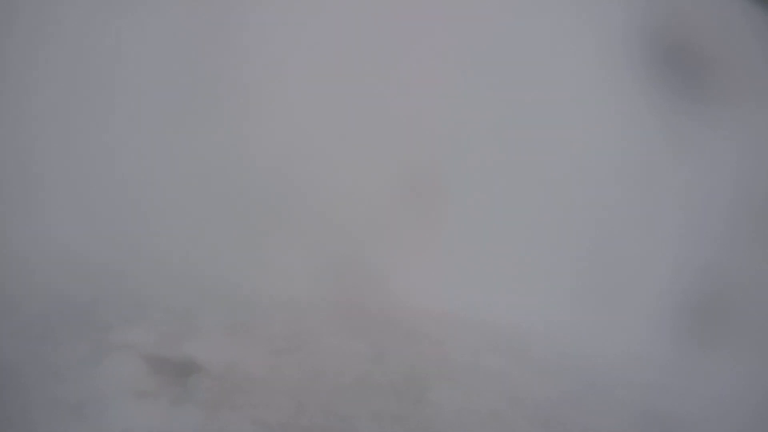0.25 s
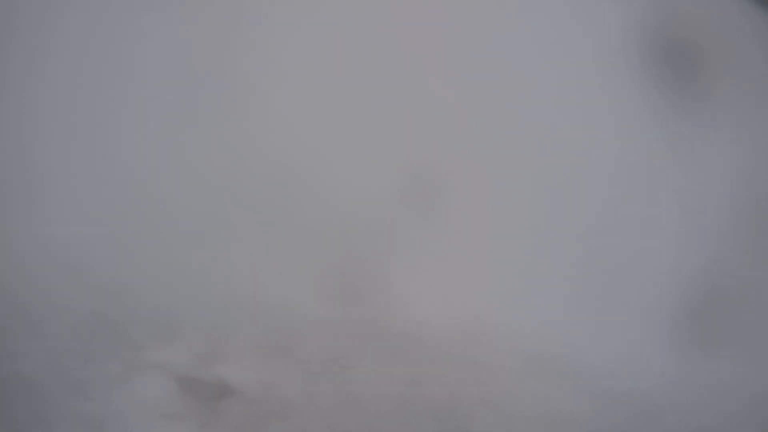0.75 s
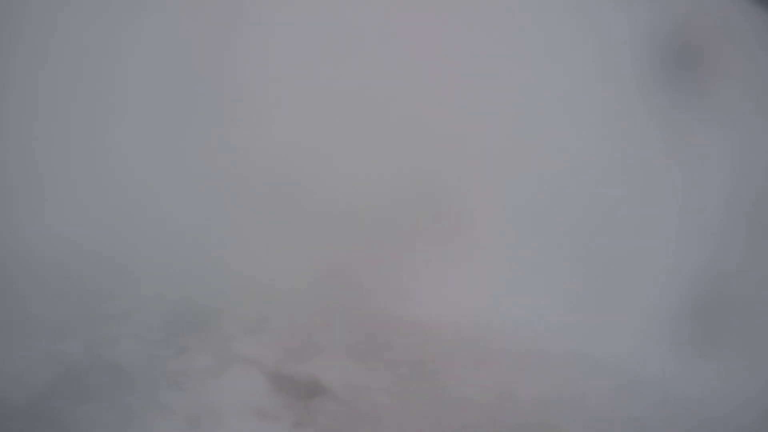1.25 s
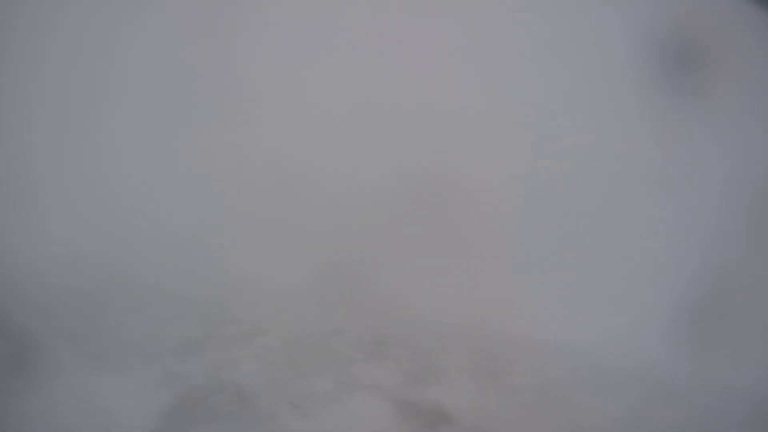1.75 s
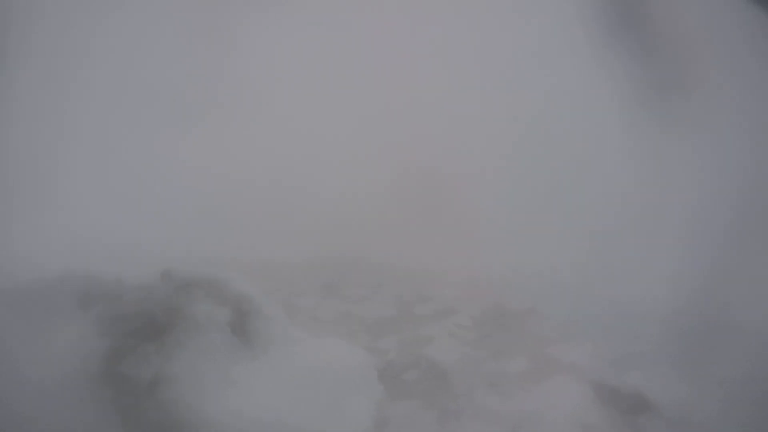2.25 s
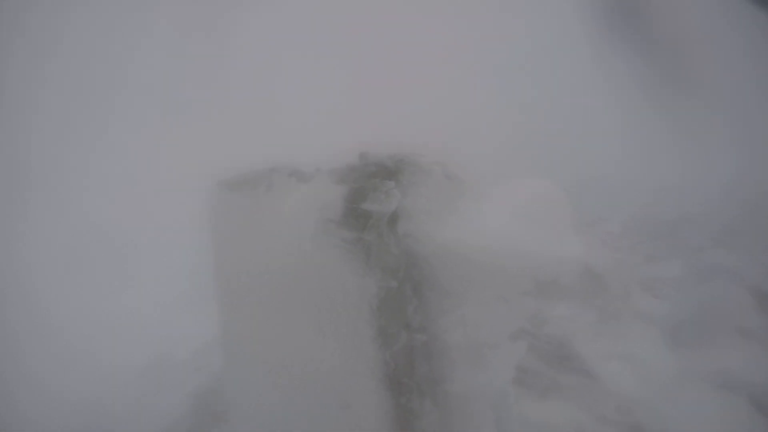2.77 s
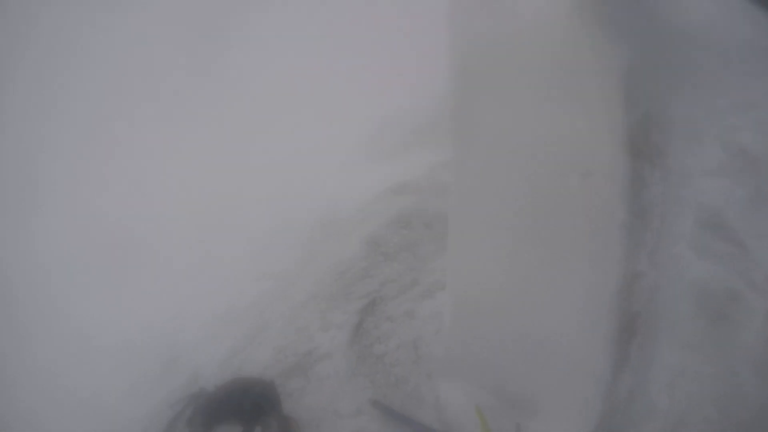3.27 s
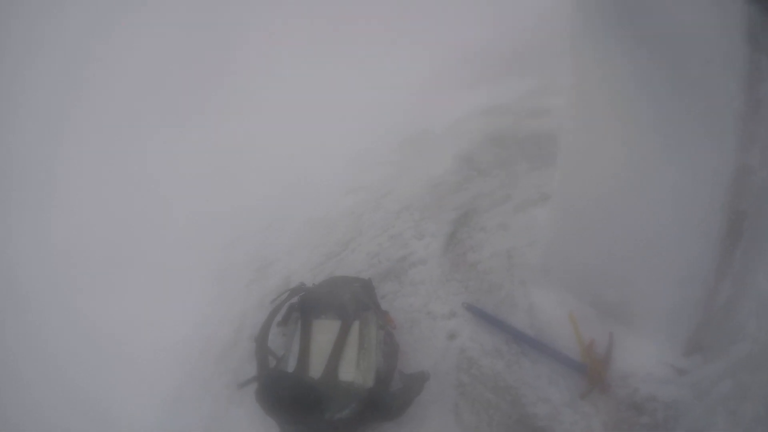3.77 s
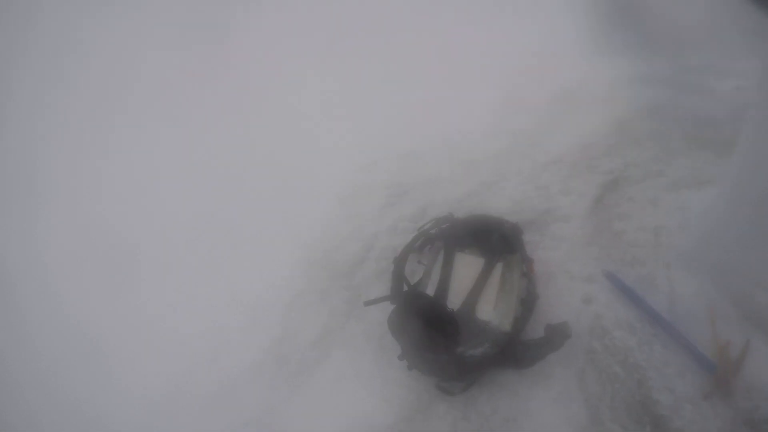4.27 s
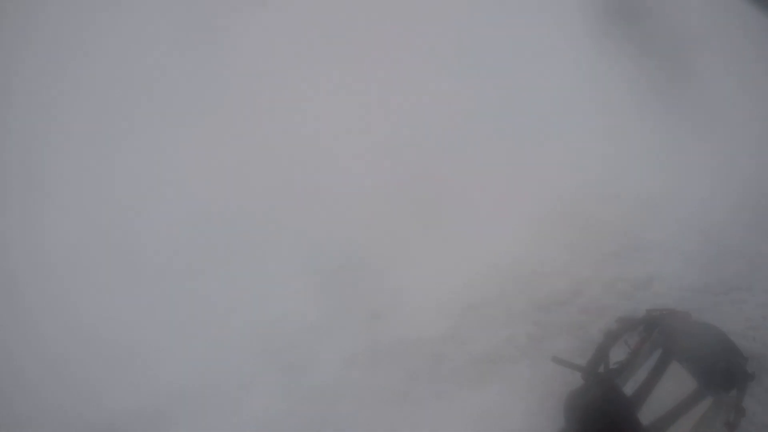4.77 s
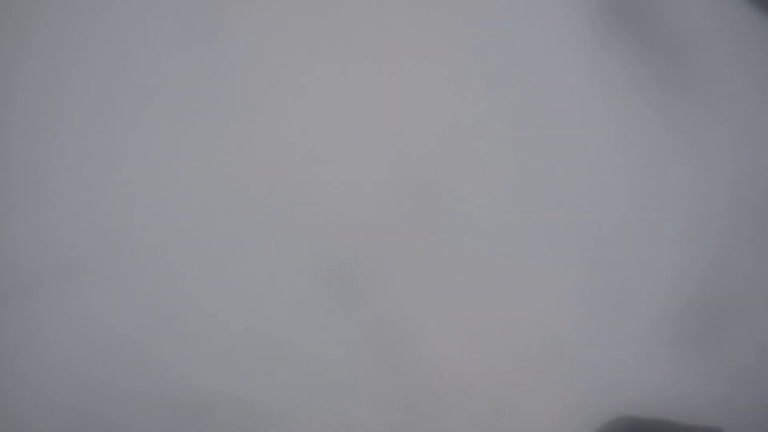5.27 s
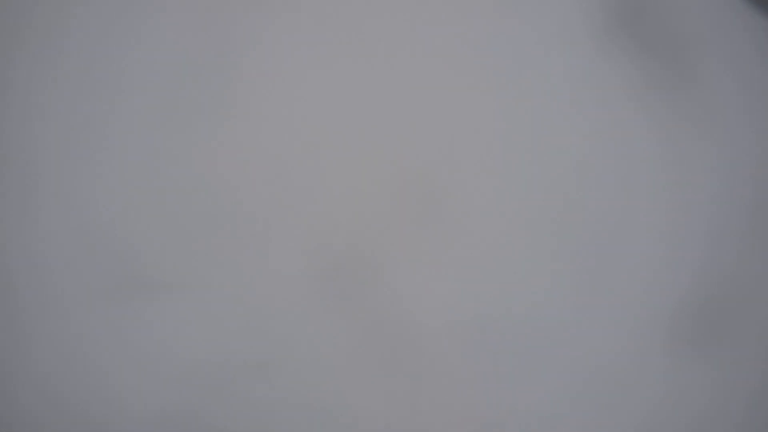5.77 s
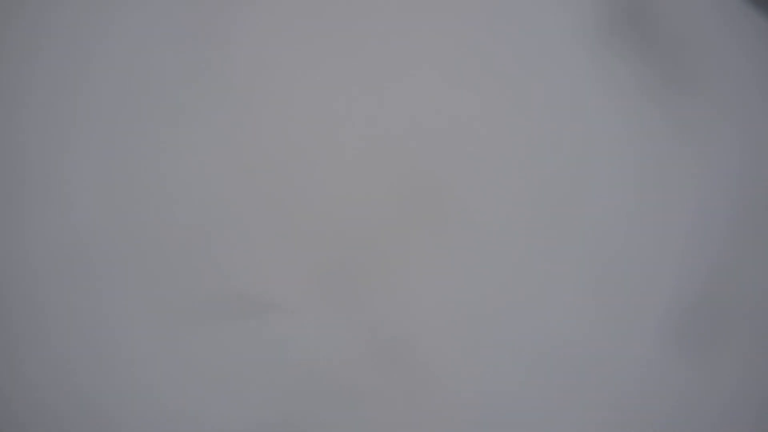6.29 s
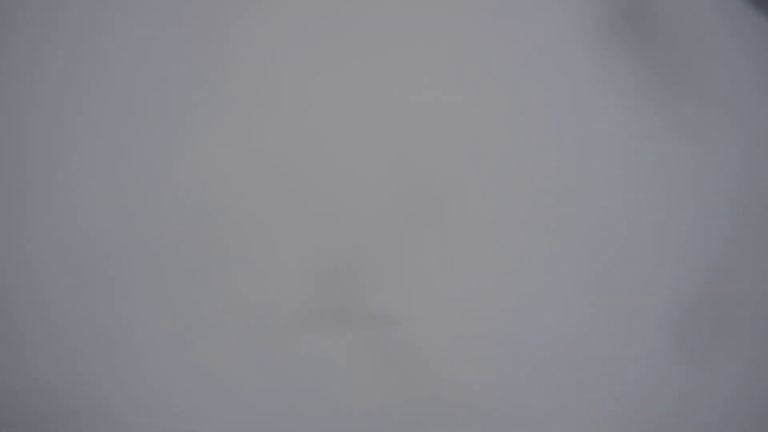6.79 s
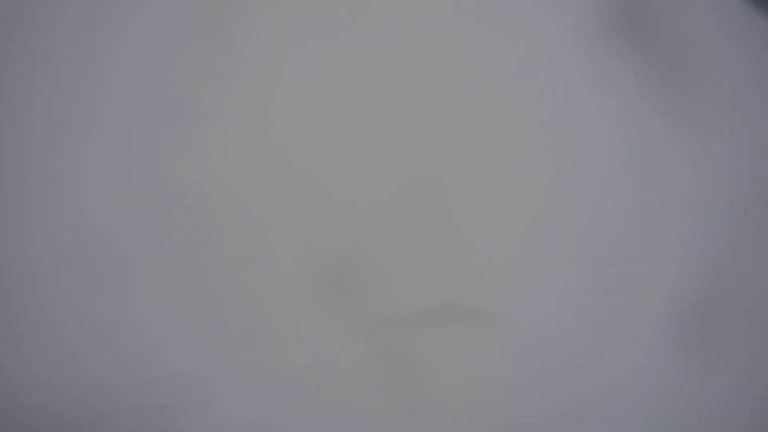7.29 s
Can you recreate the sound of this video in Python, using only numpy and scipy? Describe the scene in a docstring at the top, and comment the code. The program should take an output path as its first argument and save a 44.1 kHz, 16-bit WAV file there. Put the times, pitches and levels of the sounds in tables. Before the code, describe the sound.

On an exposed snowy summit, wind roars in a small camera's plastic case while ice pellets strike it in dense, irregular sharp cracks, the loudest overloading. After about three seconds the impacts become sparse and wind dominates. A low swell near five seconds drops to a lull, followed by ragged short gusts and a few last clicks. The microphone is directly in the weather, mono and close.

```python
"""Blizzard on a bare summit

A small camera: gusts buffet its microphone port and roar in its plastic case (shaped, patchy noise).
Ice pellets crack on the case (decaying modes plus a noise burst), thickly while it faces the wind,
sparsely once it turns away; small grains tick over a hiss of powder (noise).
The loudest cracks reach the top of the recorder's range and are limited there.
"""
import sys
import numpy as np
from scipy import signal
from scipy.fft import rfft, irfft, next_fast_len
from scipy.io import wavfile
from scipy.ndimage import uniform_filter1d, map_coordinates

SR = 44100
rng = np.random.default_rng(int(sys.argv[2]) if len(sys.argv) > 2 else 0)


def materialize(psi):
    """Save the field psi as 16-bit PCM at rate SR to the path in sys.argv[1].

    A 1-D psi becomes a single channel; in a 2-D psi each row is a channel.
    """
    bounded = np.clip(np.atleast_2d(psi).T, -1, 1)
    quanta = np.round(bounded * 32767).astype(np.int16)
    wavfile.write(sys.argv[1], SR, quanta)


N = 332514
STEADY_TOP_HZ, TOP_HZ = 15400, 16480  # band limits: wind and sleet; recorder


def amp(db):
    """Amplitude factor of a level in dB."""
    return 10 ** (np.asarray(db) / 20)


def unit(x):
    """x scaled to rms 1."""
    return x / np.sqrt(np.mean(x ** 2) + 1e-20)


def wobble(rate_hz):
    """Smooth random curve: a spline through rate_hz normal knots a second."""
    knots = rng.standard_normal(int(N * rate_hz / SR) + 4)
    return map_coordinates(knots, [np.arange(N) * rate_hz / SR])


def curves(rows):
    """Per-sample interpolation of each column after the time."""
    knot_s, *columns = np.transpose(rows)
    return [np.interp(np.arange(N) / SR, knot_s, column) for column in columns]


def filtered(x, response):
    """x with its spectrum multiplied by response(f/Hz), zero phase."""
    length = x.shape[-1]
    m = next_fast_len(length + 8192)
    spectrum = rfft(x, m) * response(np.fft.rfftfreq(m, 1 / SR))
    return irfft(spectrum, m)[..., :length]


def below(top_hz):
    """Low-pass response falling to zero over the last 150 Hz under top_hz."""
    return lambda f: np.clip((top_hz - f) / 150, 0, 1) ** 2


def rush(spectrum, patchy_db):
    """Turbulence: noise of rms 1, shaped by spectrum, with time-frequency patches of random gain."""
    z = signal.stft(rng.standard_normal(N), nperseg=512)[2]
    patches = uniform_filter1d(rng.standard_normal(z.shape), size=8, axis=0)
    patches = uniform_filter1d(patches, size=6, axis=1)
    noise = signal.istft(z * amp(patchy_db * unit(patches)), nperseg=512)[1][:N]
    hz, db = np.transpose(spectrum)

    def colour(f):
        return amp(np.interp(np.log(f + 1), np.log(hz + 1), db, left=-120, right=-120))

    return unit(filtered(noise, colour))


def wind():
    """Eddies thump the port; each swing of the thump drives air through the case, so the roar throbs with it."""
    # noise densities: f/Hz, relative density/dB
    thump_spectrum = [(15, -7.5), (30, -2), (55, -1), (85, -4.5), (140, -20.5)]
    flutter_spectrum = [(60, -60), (110, -0.5), (330, -12.5), (700, -25), (1200, -63)]
    roar_spectrum = [(450, -11), (650, -3), (1450, 0), (1760, 6.5), (2100, 0.5), (2550, 3), (3300, 0.5),
                     (3900, -14.5)]
    hiss_spectrum = [(3200, -7.5), (3900, -5), (4550, -0.5), (5600, -7), (6500, -8), (7600, -18.5),
                     (13000, -28.5)]
    song_spectrum = [(1900, -16), (2600, -5), (3500, -13.5)]
    # wind between the gusts: t/s, thump/dB, steady flutter/dB, roar/dB, hiss/dB (before wander)
    lulls = [(0.0, -34, -42, -37.5, -44.5), (0.9, -38.5, -41, -38, -45.5), (1.55, -40.5, -47, -41.5, -48),
             (2.3, -38.5, -38.5, -39, -48.5), (3.08, -34.5, -41, -43.5, -54), (3.24, -35, -36.5, -34, -42),
             (3.6, -32, -34.5, -38.5, -44), (4.1, -32.5, -36.5, -40, -50),
             (4.6, -32.5, -39.5, -42.5, -55.5), (5.0, -25, -41, -47, -61.5), (5.4, -35, -82, -54.5, -63.5),
             (6.1, -40.5, -66, -53, -64), (6.72, -40, -59.5, -59.5, -68.5),
             (7.1, -31.5, -50.5, -50.5, -67.5), (7.54, -26.5, -39, -52, -54)]
    turned_s = 5.1  # from then on the wind also sings across the port
    flutter_share = 0.47  # dB of flutter per dB of gust rise in the case
    shake_under_thump_db = 18  # flutter that the thump shakes loose
    hiss_wander_db = 3

    t = np.arange(N) / SR
    thump_db, steady_db, roar_db, hiss_db = curves(lulls)
    port_db, case_db = gusts()
    thump_db = thump_db + port_db
    roar_db = roar_db + case_db
    shaken_db = thump_db - shake_under_thump_db + flutter_share * case_db
    flutter_gain = np.hypot(amp(steady_db), amp(shaken_db))
    hiss_share = 1 - 0.17 * (t > turned_s)  # dB of hiss per dB of gust rise in the case
    hiss_db = hiss_db + hiss_share * case_db + hiss_wander_db * wobble(6.9)

    eddies = wobble(15)
    thump = unit(amp(2 * eddies) * rush(thump_spectrum, patchy_db=0.5))
    flutter = unit(amp(eddies + wobble(50)) * rush(flutter_spectrum, patchy_db=1))

    turned = np.clip(t - turned_s, 0, 0.5) * 2  # 0 to 1 over 0.5 s
    # across the port the flow tears into short rags
    throb = amp(1.1 * (thump + wobble(45)) + 2.6 * turned * wobble(110))
    roar = unit(throb * rush(roar_spectrum, patchy_db=1.35))
    hiss = unit(throb * rush(hiss_spectrum, patchy_db=2.0))
    song = unit(throb * rush(song_spectrum, patchy_db=3))
    roar = roar + amp(-11.0) * turned * song

    at_port = buffets() + amp(thump_db) * thump + flutter_gain * flutter
    return at_port + amp(roar_db) * roar + amp(hiss_db) * hiss


def sleet(count):
    """Small grains strike at random, levels skewed to a loud few, over a fine hiss of powder."""
    # sleet strength: t/s, level/dB
    strength = [(0.0, -50), (2.23, -51.5), (3.0, -54), (3.32, -70.5), (4.23, -68), (5.11, -71.5),
                (5.79, -67.5), (5.95, -72.5), (6.35, -65.5), (6.6, -70.5), (7.24, -70), (7.54, -61)]
    dullest_hz = 2200
    sleet_db, = curves(strength)
    # facing the wind makes the grains louder and widens their level spread, while the powder grows only a
    # little
    facing = (sleet_db + 70.5) / 20
    flurries_db = 3 * wobble(12)

    hit_s = rng.uniform(0, N / SR, count)
    at = (hit_s * SR).astype(int)
    size = np.minimum(rng.exponential(size=count), 2.8)
    place, hardness = rng.standard_normal((2, count))
    peak_db = (sleet_db + flurries_db)[at] + 23.5 + (2.12 + 2.33 * facing[at]) * size
    centre_hz = np.maximum(3300 * amp(4.57 * place), dullest_hz)
    grains = strike(hit_s, peak_db, centre_hz, -8 + 7 * hardness, scatter_db=7.0)

    powder = rush([(4000, -25), (7000, 0), (STEADY_TOP_HZ, -4)], patchy_db=5.5)
    return grains + amp(-70.5 + 8.0 * facing + flurries_db) * powder


def strike(hit_s, peak_db, centre_hz, treble_db, scatter_db):
    """Each pellet rings the case modes near its centre, at random strengths, and shatters (treble burst)."""
    # case modes: f/Hz, level/dB, t60/s
    case = [(676, -12.5, 0.057), (1274, -1.5, 0.014), (1820, 4.5, 0.0063), (2440, 0, 0.0083),
            (2766, 6.5, 0.0043), (3280, 10, 0.0031), (4284, 6.5, 0.0057), (4680, 9, 0.0053),
            (5010, 10, 0.003), (6090, 9.5, 0.0059), (6590, 17, 0.0041)]
    hz, mode_db, t60_s = np.transpose(case)
    t = np.arange(SR // 60) / SR
    centre_hz = centre_hz[:, None]
    luck = rng.standard_normal((len(hit_s), 2, len(hz)))

    off_centre_octaves = np.log2(hz / centre_hz)
    gains = amp(mode_db + scatter_db * luck[:, 0] - 32 * off_centre_octaves ** 2)
    phase = luck[:, 1] / 2  # rad, set by where it lands
    fade = amp(-60 * t / t60_s[:, None])
    angle = 2 * np.pi * hz[:, None] * t
    ring = (gains * np.cos(phase)) @ (fade * np.sin(angle))
    ring += (gains * np.sin(phase)) @ (fade * np.cos(angle))
    # soft, dull pellets stay in contact longer, so their ring swells more slowly
    ring *= 1 - np.exp(-(t * centre_hz) ** 2)

    crack = rng.standard_normal(ring.shape) * amp(-60 * t / 0.0038)  # t60 3.8 ms
    crack_band = signal.butter(1, [6500, 14000], "band", fs=SR, output="sos")
    crack = signal.sosfilt(crack_band, crack)

    def norm(v):
        return np.linalg.norm(v, axis=1, keepdims=True)

    tick = ring / norm(ring) + amp(treble_db)[:, None] * crack / norm(crack)
    tick *= amp(peak_db)[:, None] / np.abs(tick).max(axis=1, keepdims=True)
    at = np.round(hit_s * SR).astype(int)[:, None] + np.arange(len(t))
    return np.bincount(at.ravel(), tick.ravel(), N)[:N]


def pellets(count):
    """Each large pellet breaks, and count splinters rattle dully on the case just after it."""
    # large pellets: t/s, peak/dB (before band limit and limiter), ring centre f/Hz, shatter over ring/dB
    hits = [(0.0205, -10, 3650, -7), (0.0625, -7.5, 2950, 3.5), (0.158, -12, 3870, -7),
            (0.1751, -8.5, 4030, -12), (0.1838, -5, 2980, -3.5), (0.1877, -0.5, 2670, -20),
            (0.3246, -10, 2030, -28), (0.331, -4, 3730, -6), (0.365, -2.5, 2950, -14),
            (0.4705, -14, 1900, -21), (0.4826, 5, 3160, -12), (0.522, -12, 1900, -18),
            (0.538, -1, 3350, -16), (0.5538, -10, 1990, -35), (0.5788, -19, 2020, -24),
            (0.6482, -14, 2100, -23), (0.6502, -29, 690, -35), (0.6717, 8, 4530, -7),
            (0.6811, 1.5, 4100, 9.5), (0.695, -9, 2210, -19), (0.7018, -9, 2340, -15),
            (0.7327, -9, 4400, -18), (0.7895, -7.5, 5020, -11), (0.807, -6.5, 5860, -3),
            (0.8224, -2, 3980, -26), (0.9912, -1.5, 3270, -30), (1.0108, -5, 4600, -12.5),
            (1.0367, -0.5, 2820, -10.5), (1.044, -15.5, 2350, -15), (1.0497, 4, 2430, -31),
            (1.071, -16, 2400, -16), (1.087, -13, 6500, 2), (1.114, -10, 4620, -4), (1.1491, -10, 5500, -7),
            (1.1543, -13, 3480, 2), (1.1596, -10, 2560, -25.5), (1.1661, -6.5, 4170, -2),
            (1.1812, 3, 4700, -12), (1.3194, -5, 4100, -1.5), (1.342, -11, 3320, -6),
            (1.3878, -0.5, 2460, -34), (1.4113, -1, 5700, -5.5), (1.4513, 3, 4400, -11),
            (1.4741, -10, 2700, -26), (1.6173, -10, 3700, 12), (1.629, -11.5, 2820, -2.5),
            (1.6659, -7, 4110, -17), (1.683, -5, 2870, -9), (1.71, -4.5, 2530, -9),
            (1.7322, -9.5, 3840, -8.5), (1.821, -9.5, 2990, -21), (1.8525, -10, 5240, -11),
            (1.8633, 8, 4240, -10.5), (1.8897, -12.5, 2100, -4), (1.9277, -6.5, 2520, -24),
            (1.9533, -6.5, 4170, -7), (2.0158, -8, 1860, -17), (2.038, 1, 4840, -16.5),
            (2.0977, -8.5, 2350, -33), (2.1204, -6, 3900, -2), (2.1624, -9, 3800, -11),
            (2.2288, -3.5, 3720, -8.5), (2.2924, -4.5, 5030, -6), (2.2964, 1, 3700, -9),
            (2.423, -14, 2970, -2), (2.469, -6.5, 4450, -10), (2.4853, -8, 4540, -11),
            (2.5472, -7.5, 4400, -16), (2.5536, -7, 5010, 5), (2.5686, -2.5, 3830, -11),
            (2.653, -8.5, 2730, -13), (2.6699, -6, 3530, -3), (2.695, 6, 4630, -13.5),
            (2.7895, -11.5, 1810, -10), (2.8573, -5.5, 3740, -8), (2.881, -17, 1770, -5),
            (2.94, -16.5, 2000, -11), (3.1705, -13, 2720, -6), (3.2353, 0.5, 4900, -11),
            (3.2655, -11, 3230, 0.5), (3.4635, -16.5, 2600, -23), (3.6653, -14, 2130, -25),
            (3.8325, -14, 3420, -10), (3.9547, -11.5, 2740, -17.5), (4.363, -22.5, 1960, -34),
            (5.073, -23.5, 2570, -34), (7.24, -14, 3380, -2), (7.3259, -14.5, 3700, -0.5),
            (7.4124, -11.5, 1920, -41), (7.4216, -15.5, 2090, -29), (7.518, 1, 2260, -13.5),
            (7.5316, -18, 2550, -6)]
    hit_s, peak_db, centre_hz, treble_db = np.transpose(hits)
    whole = strike(hit_s, peak_db, centre_hz, treble_db, scatter_db=2.9)

    shape = (len(hit_s), count)
    splinter_s = hit_s[:, None] + 0.0045 * rng.exponential(size=shape)
    splinter_db = peak_db[:, None] - 21 + 4 * rng.standard_normal(shape)
    ones = np.ones(splinter_s.size)
    splinters = strike(splinter_s.ravel(), splinter_db.ravel(), 2500 * ones, -20 * ones, scatter_db=5.5)
    return whole + splinters


def gusts():
    """Level changes in dB at the port and in the case: each gust hits fast, holds and dies away."""
    # gusts over the wind: start/s, length/s, rise at the port/dB, rise in the case/dB
    gust_rows = [(0.185, 0.043, 12.5, -0.5), (2.326, 0.11, 7, 4), (2.748, 0.025, 9, -1),
                 (4.005, 0.11, -0.5, 4.5), (4.599, 0.12, 10, 0), (4.742, 0.21, 6.5, 9.5),
                 (5.479, 0.08, 0, 12.5), (5.584, 0.083, -0.5, 11.5), (5.792, 0.0099, 6, 8),
                 (5.828, 0.18, 10.5, -5), (6.369, 0.061, 8, 3), (6.75, 0.057, 11.5, 3.5),
                 (6.862, 0.14, 16, 14.5), (7.081, 0.051, 4.5, 5), (7.147, 0.033, 12.5, 6),
                 (7.217, 0.1, 7, 13), (7.461, 0.067, -0.5, 6)]
    attack_s, release_s = 0.01, 0.043
    start_s, length_s, *rises_db = np.transpose(gust_rows)
    age_s = np.arange(N) / SR - start_s[:, None]
    attack = age_s / attack_s
    release = 1 + (length_s[:, None] - age_s) / release_s
    return rises_db @ np.clip(np.minimum(attack, release), 0, 1)


def buffets():
    """Hard buffets: each swings the pressure at the port for one and a half cycles under a sine arch."""
    # buffets: start/s, peak/dB, swing f/Hz
    swings = [(0.344, -15.5, 38), (0.473, -17.5, 36.4), (0.548, -14.5, 56), (2.729, -21.5, 91)]
    start_s, peak_db, hz = np.transpose(swings)[..., None]
    progress = np.clip((np.arange(N) / SR - start_s) * hz / 1.5, 0, 1)
    arch = np.sin(np.pi * progress)
    return np.sum(amp(peak_db) * arch * np.sin(3 * np.pi * progress), axis=0)


def scene():
    """Wind, sleet and large pellets, summed to one channel."""
    steady = filtered(wind() + sleet(count=750), below(STEADY_TOP_HZ))
    # only the large pellets reach the topmost treble, 18 dB down
    cracks = filtered(pellets(count=2), lambda f: np.maximum(amp(-18.0), below(STEADY_TOP_HZ)(f)))
    return (steady + cracks)[None]


def record(dry):
    """The input stage clips smoothly near full scale; nothing is kept above the band limit."""
    clipped = dry / (1 + np.abs(dry) ** 8) ** (1 / 8)
    return filtered(clipped, below(TOP_HZ))


dry = scene()
out = record(dry)
materialize(out)
```